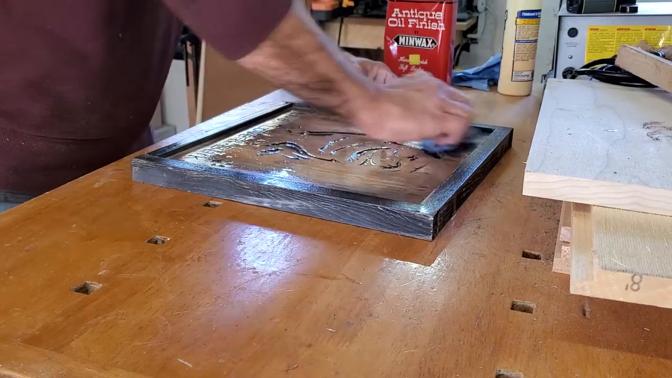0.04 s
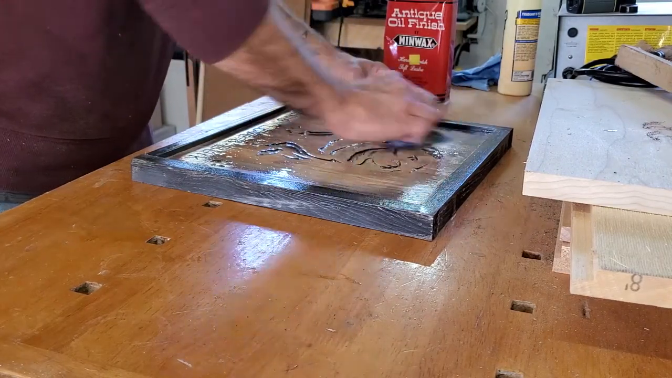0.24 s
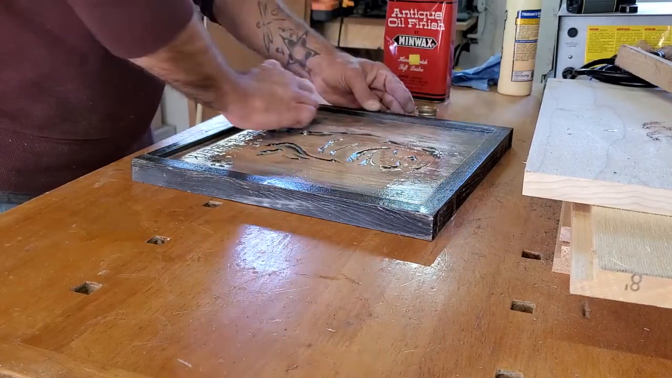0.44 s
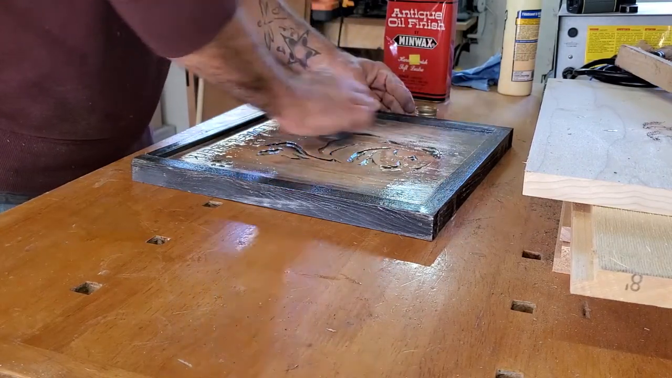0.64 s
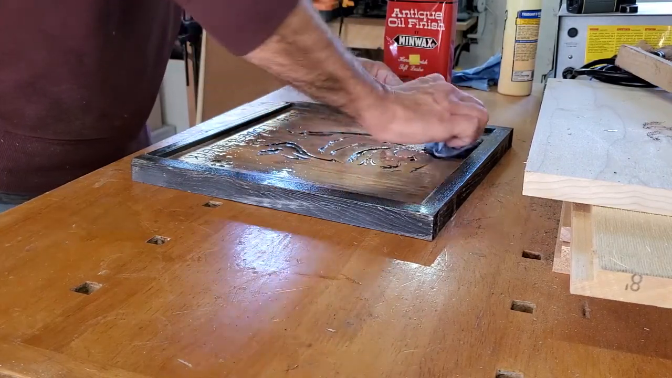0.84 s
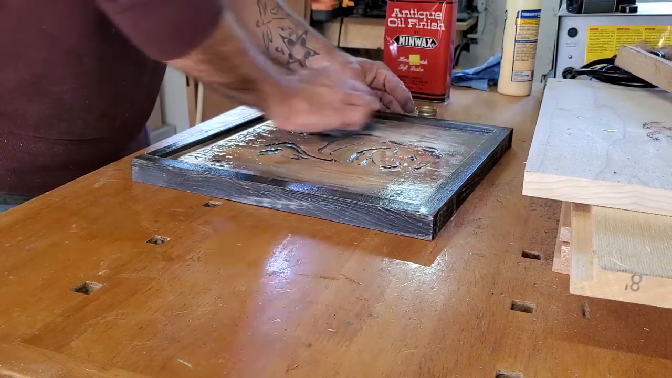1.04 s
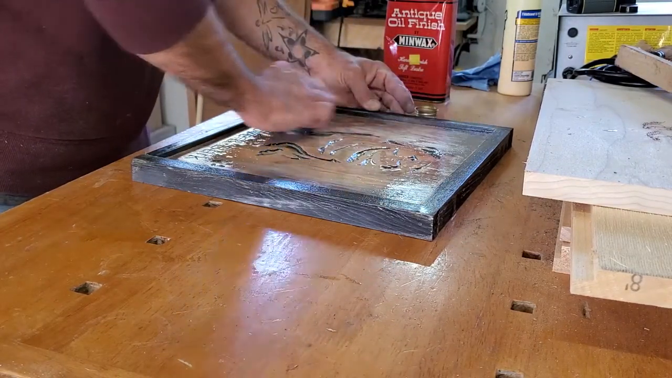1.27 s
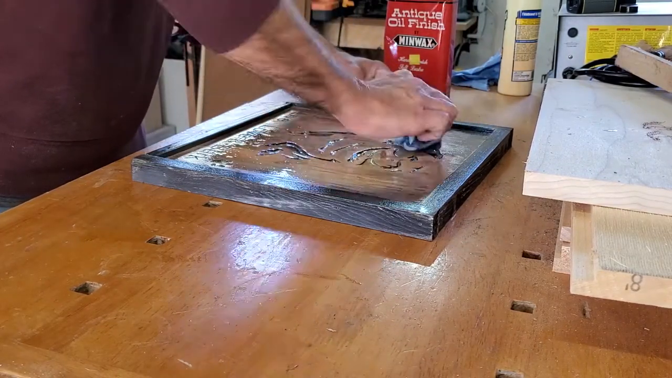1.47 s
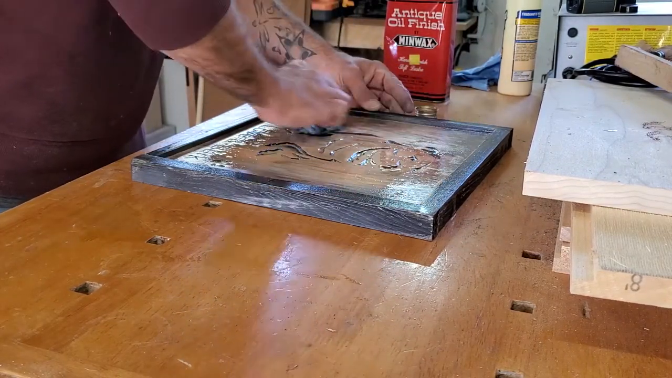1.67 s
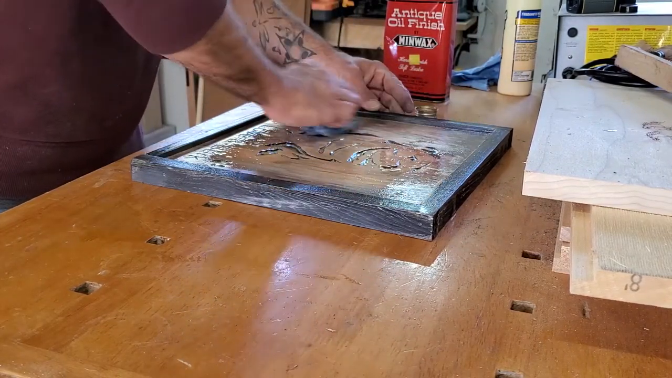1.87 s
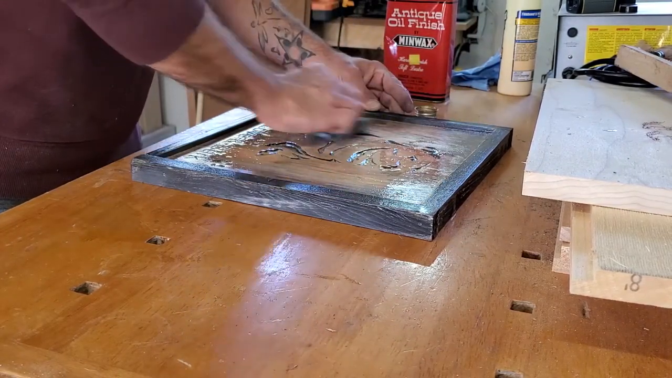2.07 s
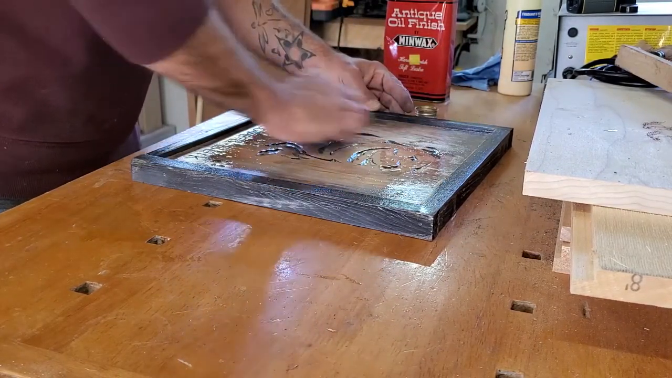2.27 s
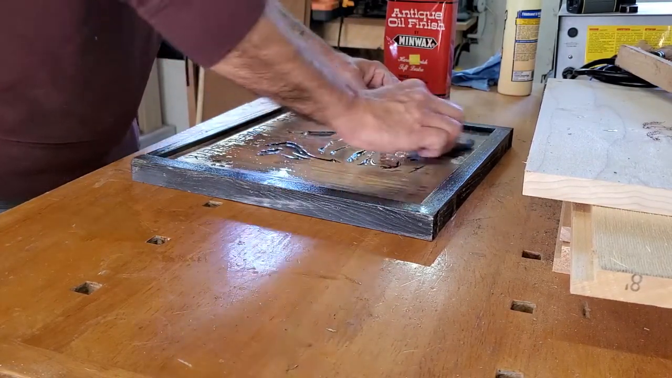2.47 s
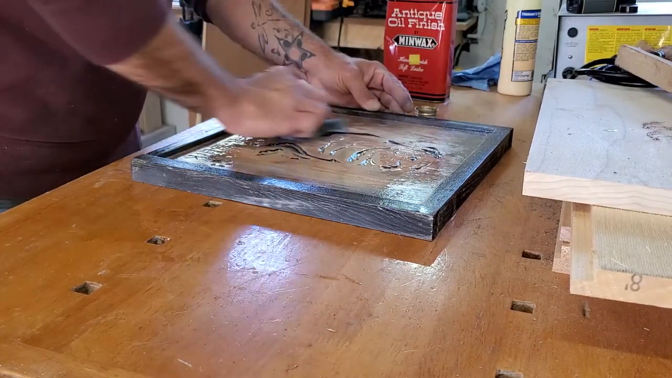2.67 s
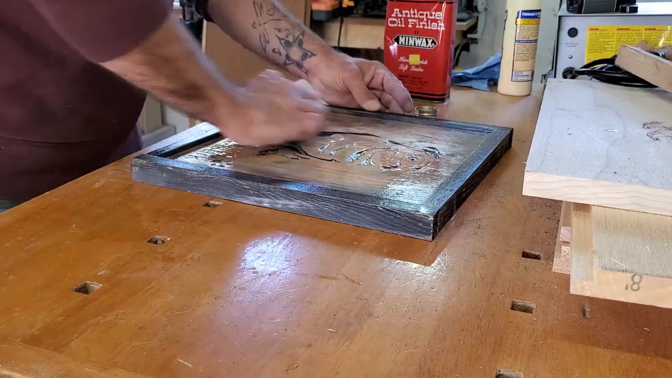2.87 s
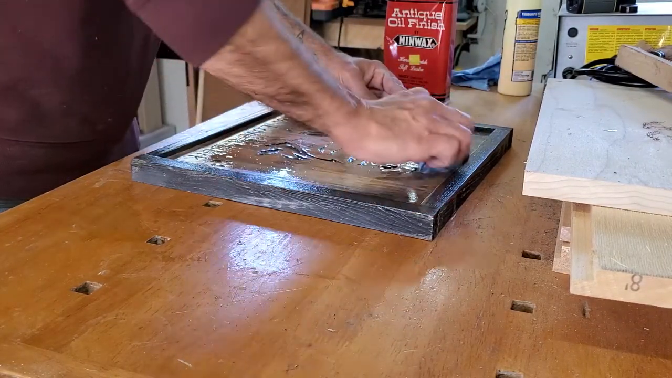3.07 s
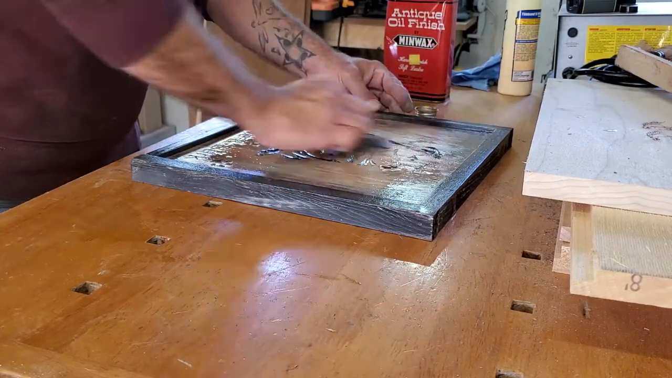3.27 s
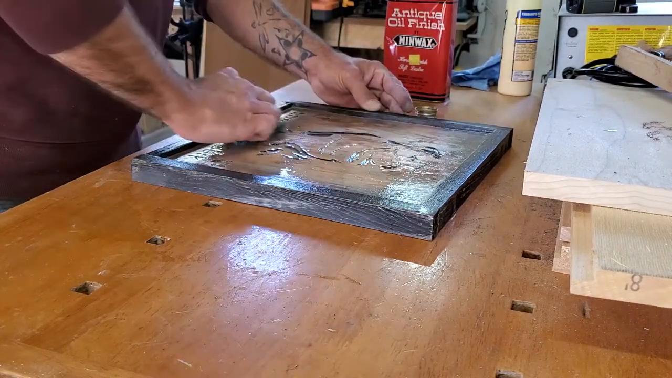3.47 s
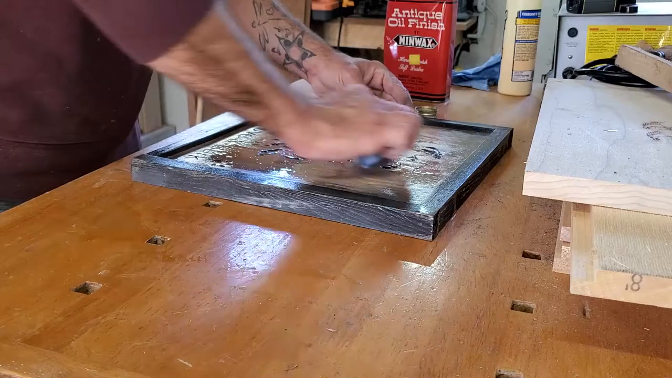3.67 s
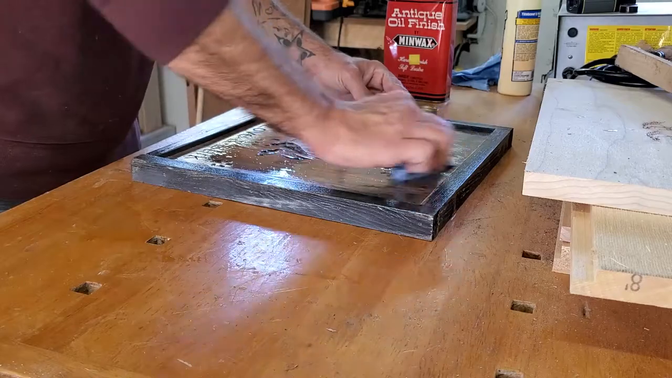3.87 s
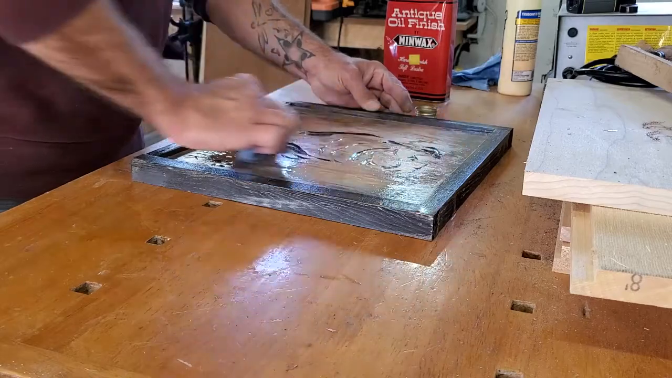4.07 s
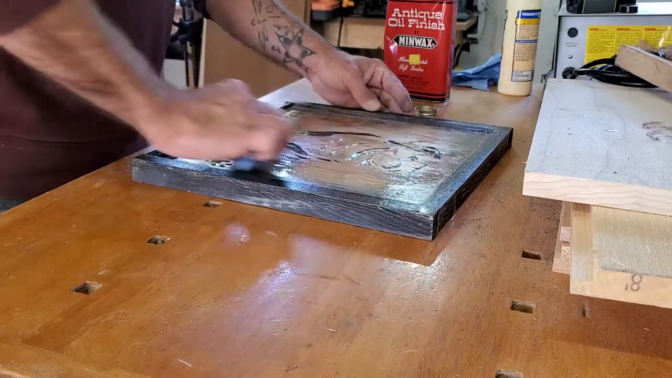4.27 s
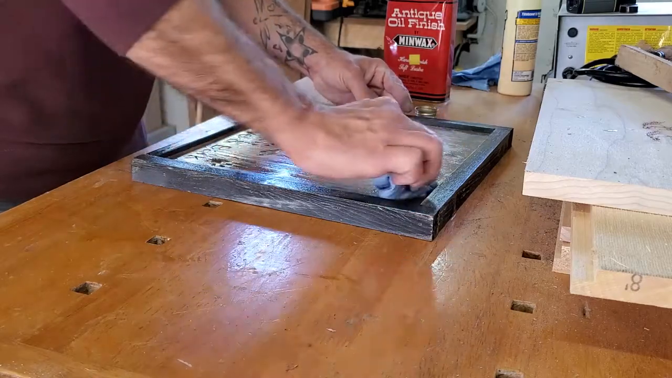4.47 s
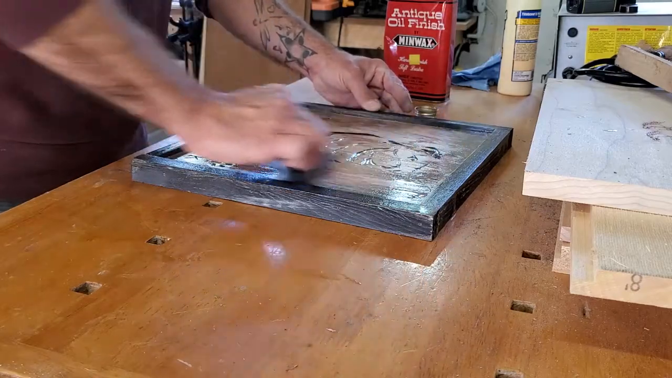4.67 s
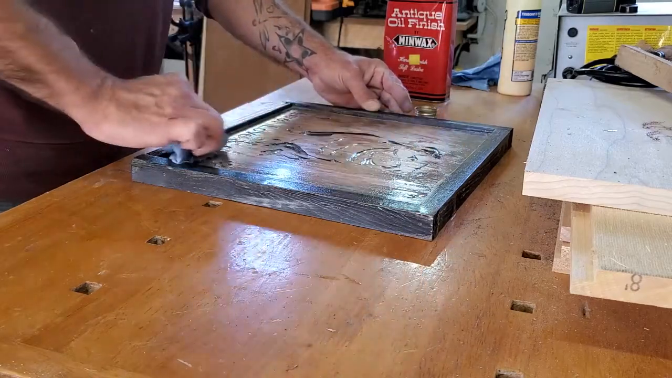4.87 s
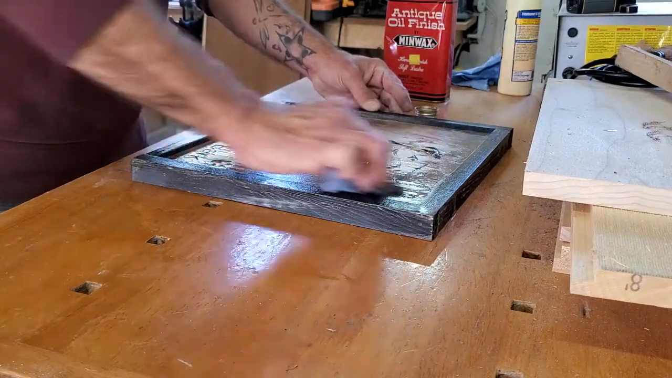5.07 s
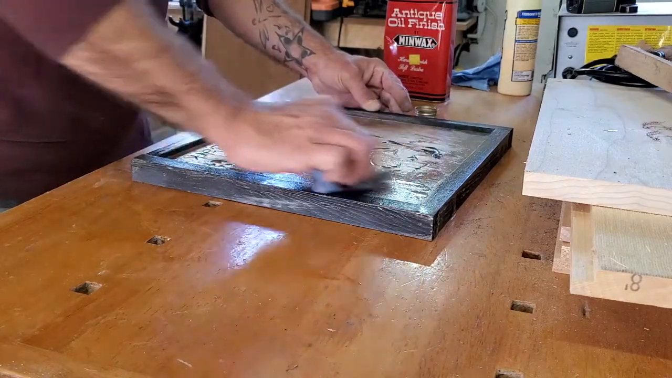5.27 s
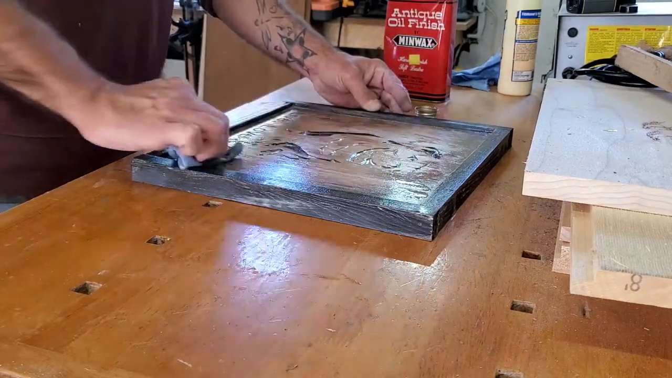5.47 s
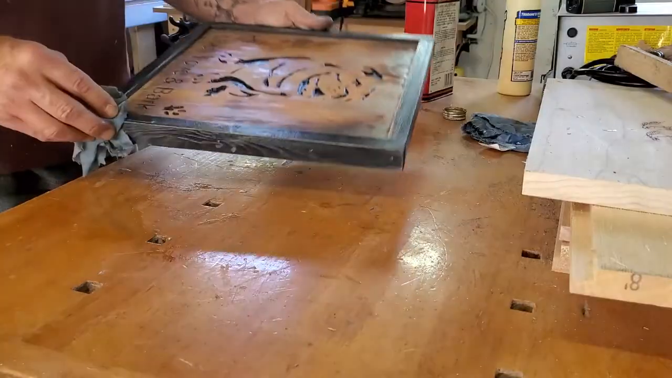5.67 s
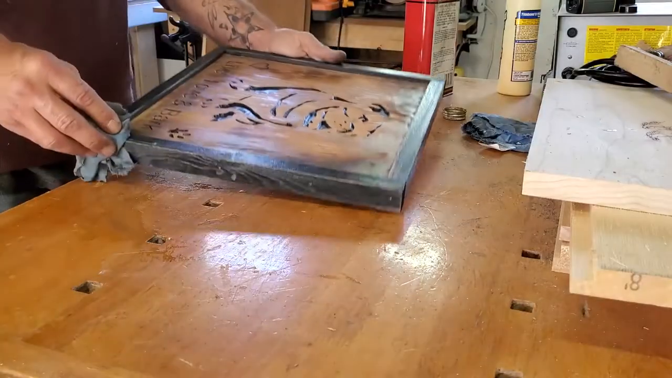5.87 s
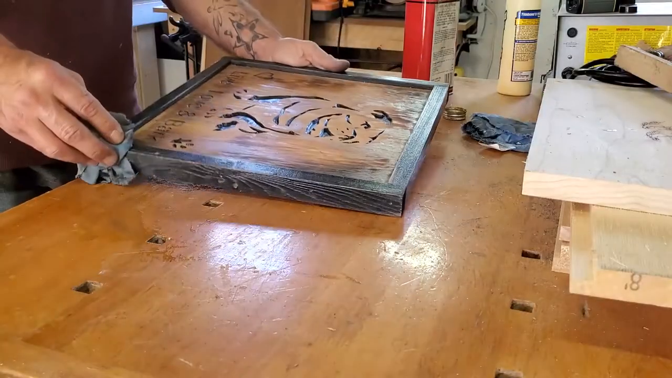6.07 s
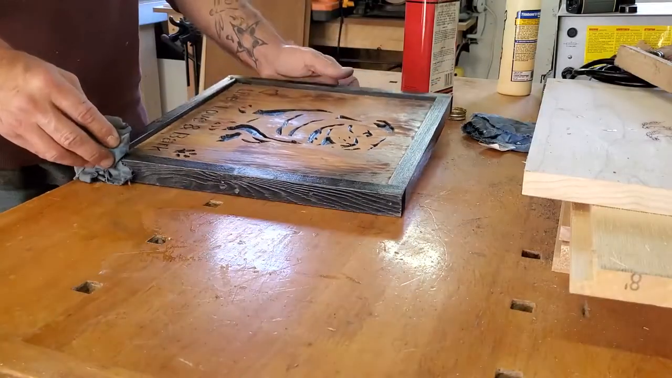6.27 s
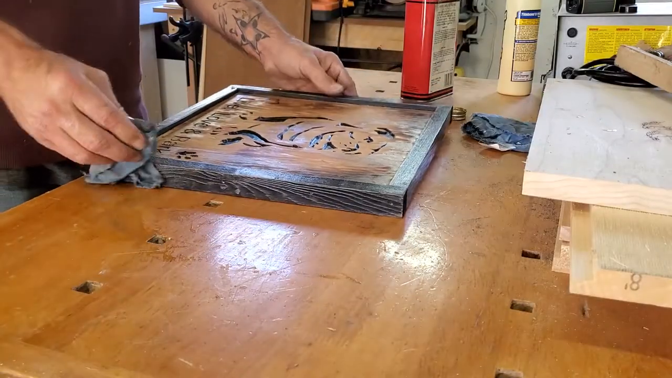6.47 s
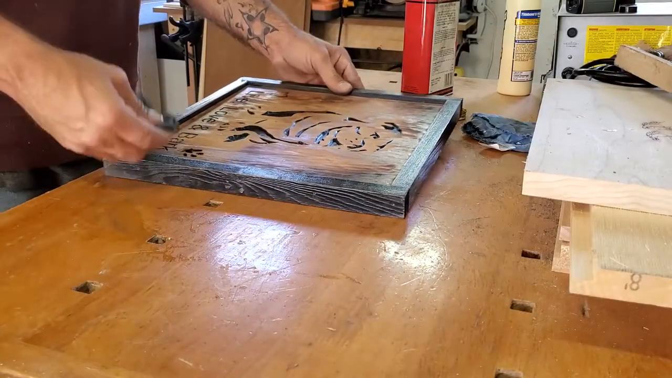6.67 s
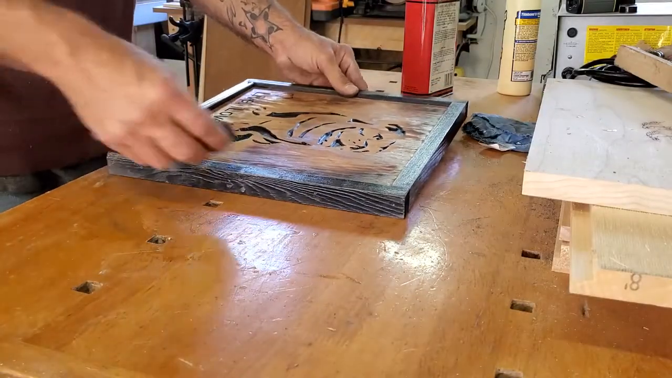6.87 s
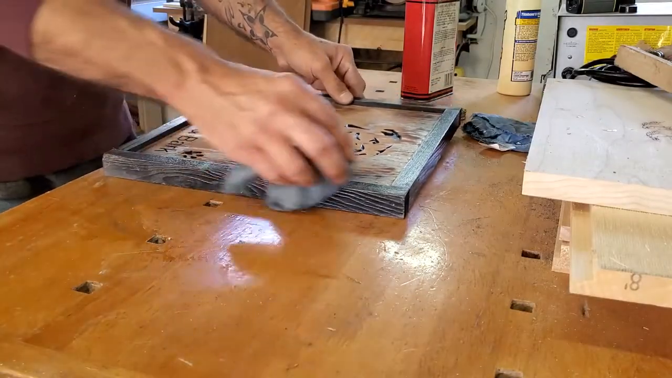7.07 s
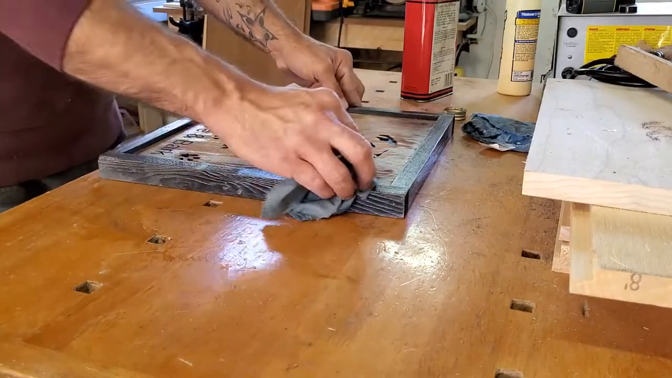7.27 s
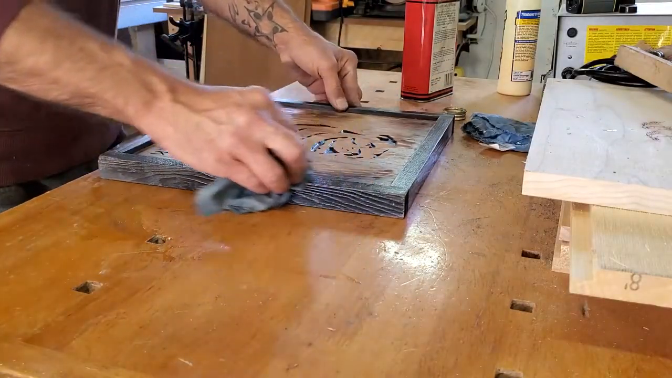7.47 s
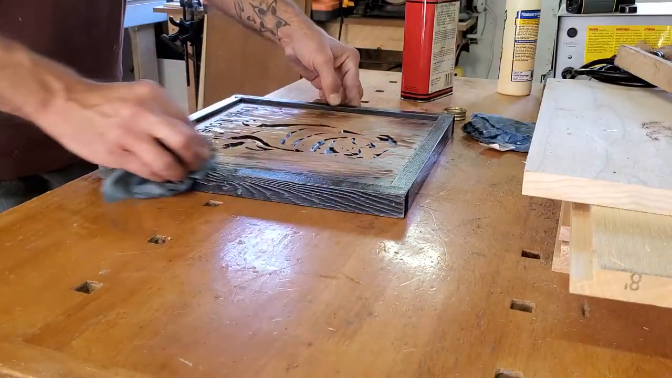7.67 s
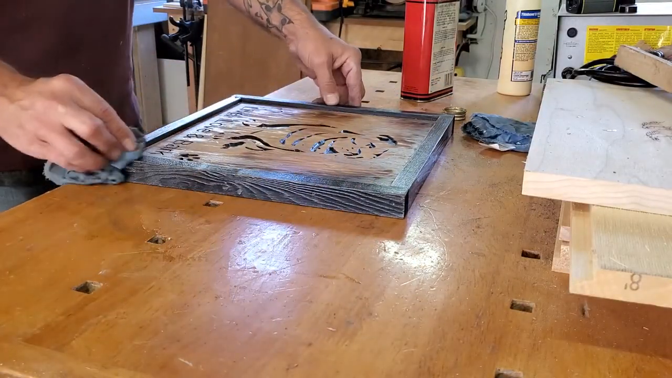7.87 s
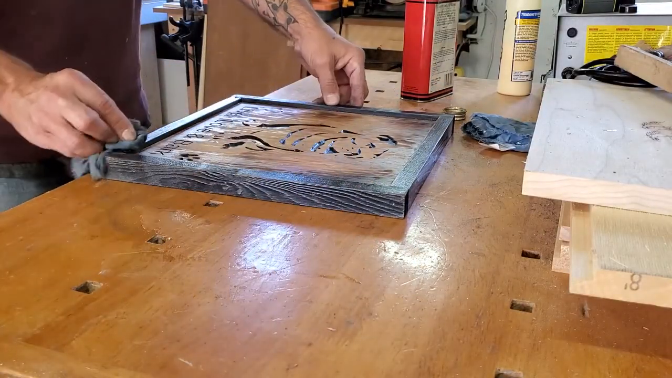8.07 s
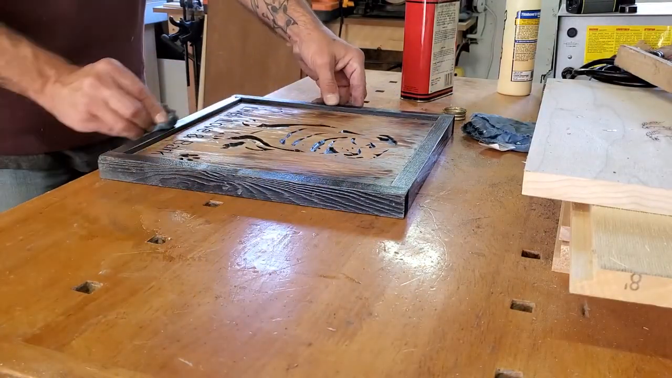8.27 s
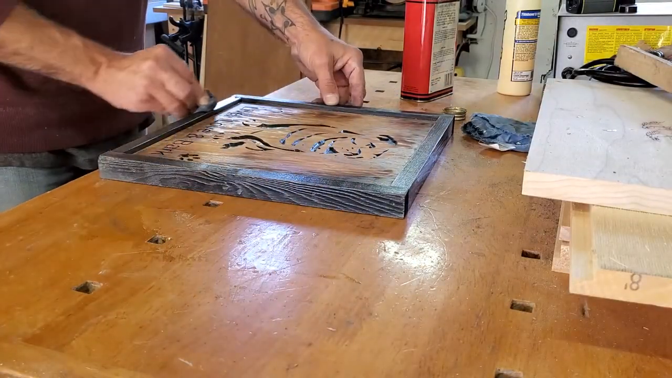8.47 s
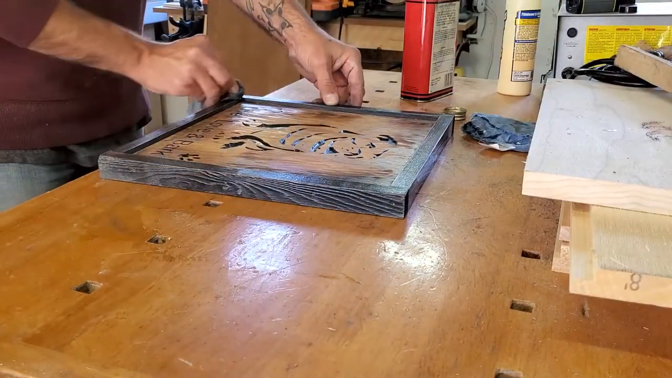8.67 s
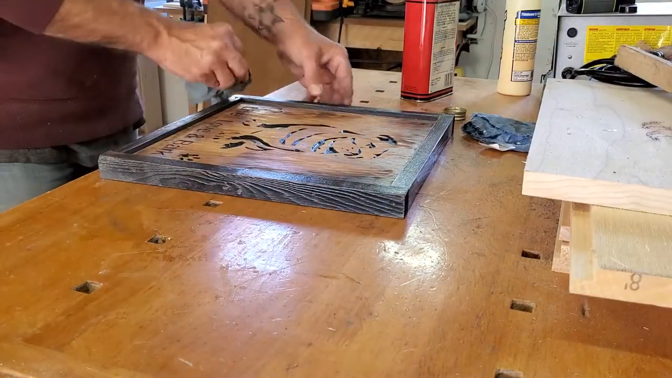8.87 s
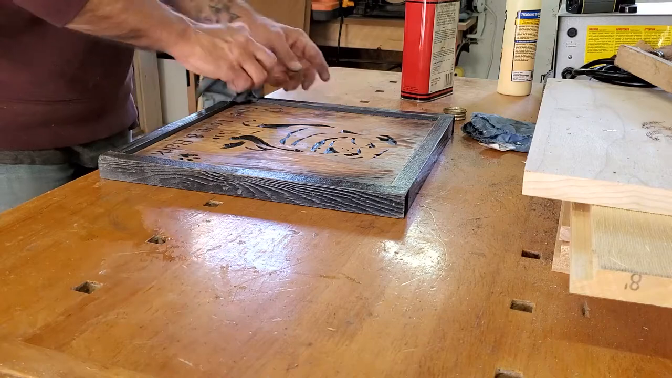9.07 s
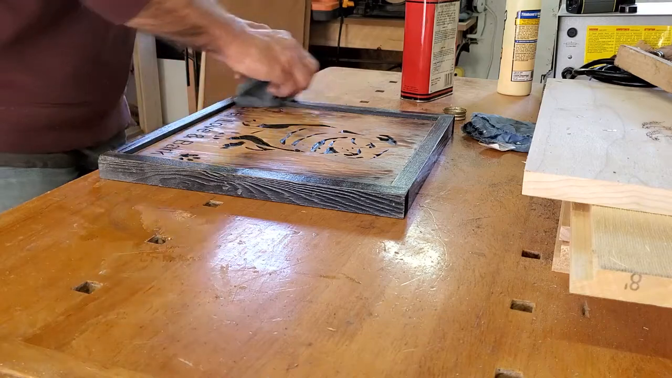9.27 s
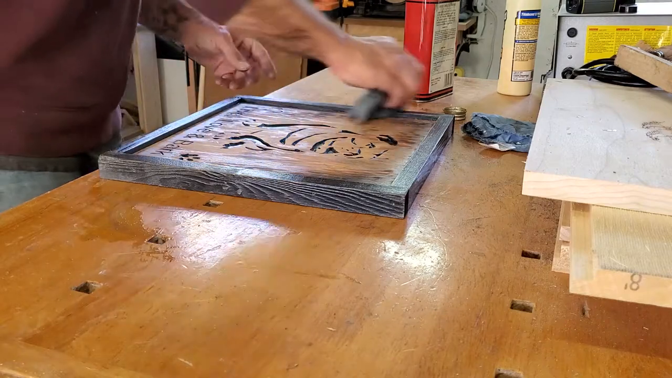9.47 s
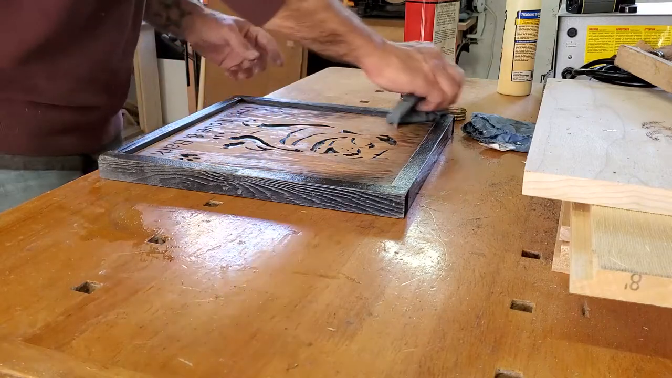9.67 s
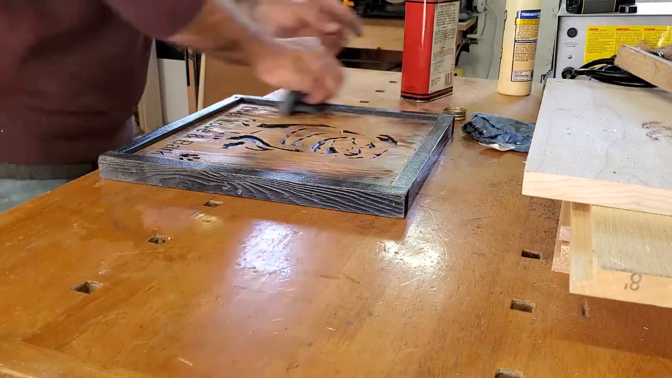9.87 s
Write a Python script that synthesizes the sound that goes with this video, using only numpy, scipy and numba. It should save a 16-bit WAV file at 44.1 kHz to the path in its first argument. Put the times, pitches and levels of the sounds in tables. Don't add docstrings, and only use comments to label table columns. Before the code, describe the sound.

Close up in a small workshop, a cloth rag rubs a framed wooden panel in fast to-and-fro strokes, hissing and rasping with a faint hollow boom, small clicks and short squeaks. The panel is lifted and set down with ringing wooden knocks, slides briefly on the bench, then gets softer, slower wipes and one last brisk rub. A distant engine drones low throughout.

```python
import sys
import numpy as np
from scipy import signal
from scipy.fft import rfft, irfft
from scipy.io import wavfile
from scipy.ndimage import uniform_filter1d, map_coordinates
from numba import njit

SR = 44100
rng = np.random.default_rng(int(sys.argv[2]) if len(sys.argv) > 2 else 0)


def volts_from_decibels(level):
    exponent = np.asarray(level, float) / 20
    return 10 ** exponent


def generate_wav(sig):
    pcm = np.round(np.clip(np.atleast_2d(sig).T, -1, 1) * 32767).astype(np.int16)
    wavfile.write(sys.argv[1], SR, pcm)


N = 437472

# turn in seconds, level at start in dB, level at end in dB,
# swell with speed in dB per tenfold, rasp compared with hiss in dB.
FACE = [(-.2, -51, -60.5, 24, -5), (0.081, -59.5, -54.5, 16.5, -6), (0.449, -55.5, -54, 21, -5),
        (.814, -58, -58.5, 14.5, -6.5), (1.161, -57, -55, 17, -3), (1.437, -62.5, -57.5, 13, -5.5),
        (1.621, -61, -59, 13, -2.5), (1.753, -59, -62, 13, -3.5), (1.868, -57, -64, 13, -4.5),
        (1.967, -63.5, -59.5, 7, -5), (2.133, -52.5, -60.5, 20, 0.5), (2.404, -59, -59, 11.5, 0.5),
        (2.741, -54.5, -53.5, 21.5, -0.5), (3.054, -59, -56, 15, -2), (3.406, -56.5, -58.5, 19, 2.5),
        (3.777, -59.5, -57.5, 15.5, -1.5), (4.115, -59.5, -59, 15, 2.5), (4.447, -62.5, -59.5, 10, 1),
        (4.798, -54, -60.5, 15.5, 0), (5.113, -60.5, -61.5, 12, 0.5), (5.451, -59.5, -71, 23, 5)]
RAILS = [(5.573, -80.5, -98, 2.8, -1.5), (5.94, -72.5, -69, 10, 4.5), (6.264, -75, -71, 16, 7),
         (6.458, -65.5, -80.5, 17, 9), (6.62, -80, -96, 3, 7), (6.79, -83.5, -59, 23, 1),
         (7.067, -77.5, -68.5, 13, 8), (7.157, -74, -62.5, 2, -0.5), (7.43, -63, -66.5, 3, -3),
         (7.885, -67, -64.5, 0.83, -19), (8.56, -73, -73, 2.5, -12), (8.613, -59.5, -72.5, 29, -5),
         (8.76, -77, -90, 1.9, 4), (9.04, -74, -61.5, 2, -1.5), (9.288, -48.5, -68, 21, 1),
         (9.515, -63, -56, 30, -3.5)]
# centre in Hz, width in Hz.
FOLDS = [(2700, 500), (3400, 600), (4300, 800), (5300, 900), (6600, 1200), (8300, 1800), (11500, 3000),
         (14500, 2500)]


def unit(x):
    return x / np.sqrt(np.mean(x ** 2))


def noise():
    return rng.standard_normal(N)


def curves(table):
    s, *columns = np.transpose(table)
    return [np.interp(np.arange(N) / SR, s, c) for c in columns]


def colour(x, points):
    hz, db = np.transpose(points)
    f = np.log(np.fft.rfftfreq(N, 1 / SR) + 1)
    return irfft(rfft(x) * volts_from_decibels(np.interp(f, np.log(hz), db)), N)


@njit
def svf(x, hz, width):
    y, b, l, g, k = np.empty(len(x)), 0., 0., 0., 0.
    for i in range(len(x)):
        if i % 8 == 0:
            g, k = np.tan(np.pi * hz[i] / SR), width / hz[i]
        v = (b + g * (x[i] - l)) / (1 + g * (g + k))
        b, l, y[i] = 2 * v - b, l + 2 * g * v, k * v
    return y


def band(x, hz, width_hz):
    return svf(x, hz + np.zeros(N), float(width_hz))


def steep(x, hz, width_hz):
    return unit(band(band(x, hz, width_hz), hz, width_hz))


def walk(rate):
    k = int(SR / rate)
    steps = np.repeat(rng.standard_normal(N // k + 1), k)
    return uniform_filter1d(uniform_filter1d(steps, k), k)[:N]


def slips(rate, spread_db):
    moments = rng.random(N) < rate / SR
    return unit(moments * rng.standard_normal(N) * volts_from_decibels(spread_db * rng.exponential(size=N)))


def add(out, x, s):
    i = int(s * SR)
    out[i:i + len(x)] += x[:N - i]


def delay(x, lag_us):
    return map_coordinates(x, [np.arange(N) - lag_us * SR / 10 ** 6], order=3)


def strokes():
    last_turn_s, creep = 9.95, 0.063
    t, rows = np.arange(N) / SR, np.array([*FACE, *RAILS])
    turns = np.append(rows[:, 0], last_turn_s)
    k = np.searchsorted(turns, t, side="right") - 1
    way = (t - turns[k]) / np.diff(turns)[k]
    speed = np.sin(np.pi * way)
    _, first_db, last_db, swell_db, rasp_db = rows[k].T
    pressure_db = first_db + (last_db - first_db) * way
    hiss_db = pressure_db + swell_db * np.log10((speed + creep) / (1 + creep))

    def roll(x):
        return uniform_filter1d(x, int(0.029 * SR))

    rasp_hz = 1605 + 420 * speed + 39 * roll(np.clip(rasp_db, -10, 3))
    return roll(hiss_db), roll(rasp_db), rasp_hz


def cloth():
    folds = [np.minimum(4 * walk(12), 4) for _ in FOLDS]
    return folds, 0.8 * walk(25), 2.2 * walk(40)


def rag(hiss_db, rasp_db, rasp_hz, folds, grip_db, grain_db):
    # pitch in Hz, level in dB per Hz.
    hiss_colour = [(150, -41), (290, -55), (600, -6.5), (971, -5.5), (1730, -2.5), (4350, -1.5), (9610, -4),
                   (15700, -4.5)]
    # centre in Hz, width in Hz, level in dB.
    skin = [(1240, 40, -13.5), (1400, 113, -13), (1730, 160, -18.5)]
    hiss = colour(slips(30000, 2.15), hiss_colour)
    for fold_db, (hz, width_hz) in zip(folds, FOLDS):
        hiss = hiss + (volts_from_decibels(fold_db) - 1) * band(hiss, hz, width_hz)
    hiss = unit(hiss)
    hiss = hiss + band(hiss, 13800, 12000) * volts_from_decibels(-16 - 0.96 * rasp_db)
    grain = slips(9000, 1.6)
    rasp = steep(grain, rasp_hz * volts_from_decibels(2.53 * walk(30)), 1440)
    rasp = rasp + 0.41 * steep(grain, 2 * rasp_hz, 500)
    rasp = signal.sosfilt(signal.butter(6, 1150, "highpass", fs=SR, output="sos"), rasp)
    rasp = rasp + sum(volts_from_decibels(db + walk(12)) * unit(band(rasp, hz, width_hz)) for hz, width_hz, db in skin)
    hiss = hiss * volts_from_decibels(2 + 3.2 * walk(60))
    rasp = rasp * volts_from_decibels(rasp_db - 4 + grain_db)
    return (hiss + rasp) * volts_from_decibels(hiss_db + grip_db)


def port_lag():
    # time in seconds, lag in microseconds.
    rail_lag = [(6.4, 162), (7.1, 47), (7.85, 221), (8.401, 143), (9.35, 1), (9.7, 96)]
    ends = [(s, 36 + 21 * s if k % 2 == 0 else -20) for k, (s, *_) in enumerate(FACE)]
    return curves([*ends, *rail_lag])[0]


def boom(hiss_db, rasp_db):
    push_db = hiss_db + 0.96 * rasp_db
    drum = steep(noise(), 356, 43) * volts_from_decibels(push_db - 12 + 2 * walk(23))
    bench = steep(noise(), 430, 650) * volts_from_decibels(-77.5 + 5.4 * (push_db + 56.5))
    before_lift = np.arange(N) < RAILS[0][0] * SR
    return before_lift * (drum + bench)


def drone():
    # time in seconds, firing pitch in Hz, level in dB.
    engine = [(0, 70, -67.5), (1.2, 73, -66), (1.6, 66, -70), (3.0, 69, -68.5), (4.1, 73, -68),
              (5.6, 69, -64), (6.2, 68, -56), (7.9, 69.3, -57), (8.3, 71, -54.5), (9.1, 69.5, -54.5),
              (9.92, 73.5, -56)]
    # pitch in Hz, level in dB per Hz.
    rumble_colour = [(25, -21), (48, 7.5), (85, 3), (125, -17), (180, -46.5)]
    hz, tone_db = curves(engine)
    turning = np.cumsum(hz * (1 + 0.015 * walk(10))) / SR
    tone = np.sqrt(2) * np.sin(2 * np.pi * turning) * volts_from_decibels(tone_db + 1 + 3 * walk(11))
    growl = steep(noise(), 106, 60) * volts_from_decibels(tone_db - 19.5)
    rumble = unit(colour(noise(), rumble_colour)) * volts_from_decibels(-45 + 0.31 * tone_db + 0.5 * walk(2.3))
    return tone + growl + rumble


def air():
    # pitch in Hz, level in dB per Hz.
    air_colour = [(59, -16), (165, -22.5), (240, -20.5), (363, -20.5), (1120, -28.5), (4500, -42),
                  (6500, -70), (15700, -92)]
    # pitch in Hz, width in Hz, level in dB.
    lamp = (5900, 110, -96.5)
    hz, width_hz, db = lamp
    still = unit(colour(noise(), air_colour)) * volts_from_decibels(-72.5 + 1.1 * walk(5))
    return still + steep(noise(), hz, width_hz) * volts_from_decibels(db + 7 * walk(12))


def ticks_and_squeaks():
    # time in seconds, peak in dB, centre in Hz, length in milliseconds.
    snaps = [(0.164, -39, 8000, 1), (.532, -46, 3560, 0.38), (0.9157, -27, 12500, 0.41),
             (2.24, -43, 13000, .5), (4.027, -39, 8000, 0.99), (4.294, -51, 2500, 0.77),
             (4.312, -40.5, 2250, .9), (4.828, -44, 2510, 1.1), (6.393, -41.5, 2800, 0.4),
             (6.3947, -41, 12000, 0.2), (6.3944, -49, 6500, 0.25), (7.786, -44, 9000, .6),
             (7.913, -48, 3080, 2.5), (9.404, -37, 9100, .6)]
    # start in seconds, length in seconds, first Hz, last Hz, level in dB.
    squeaks = [(0.443, 0.08, 6340, 6450, -60), (2.86, 0.09, 1470, 1680, -57),
               (3.608, 0.061, 2210, 1360, -55), (4.958, 0.068, 2270, 1760, -48.5),
               (4.963, 0.081, 4050, 3800, -57.5), (5.338, 0.068, 1940, 1160, -58.5),
               (7.507, 0.12, 1400, 1160, -61.5), (9.713, 0.067, 2720, 2500, -54),
               (9.72, .05, 4600, 4380, -60), (1.023, 0.085, 1750, 1650, -64),
               (1.194, 0.067, 1300, 1250, -60), (.5, 0.046, 1300, 1300, -60),
               (7.897, 0.041, 1510, 1500, -60)]
    out, t, rub = np.zeros(N), np.arange(-220, 220) / SR, noise()
    for s, db, hz, ms in snaps:
        snap = svf(rub[int(s * SR):][:len(t)], hz + 0 * t, 0.31 * hz)
        snap = snap * np.exp(-(1000 * t / ms) ** 2)
        add(out, volts_from_decibels(db) * snap / np.abs(snap).max(), s + t[0])
    for s, length, from_hz, to_hz, db in squeaks:
        n = int(length * SR)
        width_hz = 650. if from_hz < 5000 else 200.
        glide = np.linspace(from_hz, to_hz, n)
        sing = svf(rub[int(s * SR):][:n], glide, width_hz)
        sing = unit(svf(sing, glide, width_hz))
        add(out, volts_from_decibels(db) * np.hanning(n) ** 0.5 * sing, s)
    return out


def blow(modes, where, push):
    t = np.arange(SR // 2) / SR
    hz, db, t60 = np.transpose(modes)[:, :, None]
    sense = (-1.) ** np.arange(len(modes))[:, None]
    fade = np.exp(-np.log(1000) * t / t60)
    ring = sense * volts_from_decibels(db + where) * np.sin(2 * np.pi * hz * t) * fade
    ring = np.convolve(ring.sum(axis=0) * (1 - np.exp(-t / 0.0016)), push)
    return ring / np.abs(ring).max()


def burst(x, s, decay_s):
    t = np.arange(SR // 4) / SR
    return x[int(s * SR):][:len(t)] * (1 - np.exp(-t / 0.0004)) * np.exp(-t / decay_s)


def knocks():
    # time in seconds, peak in dB, brightness in dB per octave,
    # thud compared with peak in dB, bench thump compared with peak in dB.
    contacts = [(5.786, -21.5, 1, -10, -15.5), (5.837, -28, 6, -11.5, -13), (5.917, -74.5, 1, -21, -9),
                (6.011, -25, 4, -16, -4.5), (6.027, -15.5, 6.5, -12.5, -14),
                (6.035, -17.5, -1.5, -25.5, -42), (6.119, -39.5, -28, -17, -13),
                (6.338, -57.5, -23, -19, -3), (6.514, -50, -13, -7, -11), (6.524, -37.5, -3, -29, -1.5),
                (6.544, -40, -16, -17, -11), (7.144, -49.5, 2, 6, 4), (7.166, -55, -16, -8, -9),
                (7.19, -51.5, -30, -21, 5), (6.572, -49, -10, -21, -13), (8.677, -59, 1, -2, 3)]
    # time in seconds, peak in dB.
    corners = [(5.787, -33), (5.8367, -42), (6.0108, -41), (6.025, -22), (6.044, -45), (6.4951, -64),
               (6.5216, -49), (6.865, -61), (7.0965, -53), (7.1192, -53)]
    # pitch in Hz, level in dB, time to fade by 60 dB in seconds.
    panel_modes = [(226, -6.5, 0.093), (270.3, 6.5, 0.17), (329, 6.5, 0.13), (380, -15.5, 0.059),
                   (418, -13, .12), (513, -5.5, 0.12), (549, -0.5, 0.1), (583, 0.5, 0.1), (784, -1, 0.071)]
    bench_modes = [(70, 8, 0.19), (101.7, 4, 0.32), (150, -6.5, 0.12)]
    frame_modes = [(897, -8, 0.12), (1007, -31, 0.068), (1172, 2.5, 0.088), (1330, 0, 0.072),
                   (1457, 5, 0.032), (1689, 13.5, 0.016), (1860, 0.5, 0.034), (2500, -28, 0.18),
                   (2500, -12, .05)]
    out = np.zeros(N)
    thud, grit = steep(noise(), 400, 360), steep(noise(), 1600, 1400)
    octave = np.log2(np.array(panel_modes)[:, :1] / panel_modes[0][0])
    spots = rng.standard_normal((len(contacts), len(panel_modes), 1))
    for (s, db, tilt_db, thud_db, thump_db), spot in zip(contacts, spots):
        where = 2.9 * spot + tilt_db * octave
        add(out, volts_from_decibels(db - 0.5) * blow(panel_modes, where, np.hanning(36)), s)
        add(out, volts_from_decibels(db + thump_db) * blow(bench_modes, 0, np.hanning(90)), s)
        add(out, volts_from_decibels(db + thud_db) * burst(thud, s, 0.0085), s)
    spots = rng.standard_normal((len(corners), len(frame_modes), 1))
    for (s, db), spot in zip(corners, spots):
        add(out, volts_from_decibels(db - 2) * blow(frame_modes, spot, np.hanning(14)), s)
        add(out, volts_from_decibels(db - 10) * burst(grit, s, 0.0047), s)
    return signal.sosfilt(signal.butter(3, 3600, fs=SR, output="sos"), out)


def drag():
    # start in seconds, length in seconds, level at start in dB, level at end in dB.
    slides = [
        (6.103, 0.14, -51.5, -70),
        (6.305, 0.097, -78, -67),
        (6.488, 0.23, -72, -71.5),
        (6.852, 0.25, -61, -69),
        (7.091, 0.093, -51.5, -72),
    ]
    # pitch in Hz, width in Hz, level in dB.
    drag_modes = [(524, 45, -0.5), (787, 33, -5), (954, 94, 1), (1324, 110, 3), (1480, 150, -6),
                  (2450, 240, -7.5)]
    chatter = slips(1500, 0.92)
    wood = unit(sum(volts_from_decibels(db + 6.7 * walk(25)) * steep(chatter, hz, width) for hz, width, db in drag_modes))
    t, gain = np.arange(N) / SR, 0
    for s, length, start_db, end_db in slides:
        sliding = (t > s) & (t < s + length)
        gain = gain + sliding * volts_from_decibels(np.interp(t, [s, s + length], [start_db, end_db]))
    return wood * uniform_filter1d(gain, size=400)


def room(x):
    t = np.arange(SR // 2) / SR
    tail = rng.standard_normal(len(t)) * np.exp(-np.log(1000) * t / 0.32)
    tail = tail * np.clip(t / 0.0062, 0, 1)
    return signal.fftconvolve(x, volts_from_decibels(-9) * tail / np.sqrt(np.sum(tail ** 2)))[:N]


def scene():
    # pitch in Hz, level in dB.
    direct = [(700, 0), (2000, -1.5), (4500, -2.5), (12000, -6)]
    # pitch in Hz, level in dB.
    scattered = [(100, -17), (400, -12), (900, -4), (2000, -2), (5000, 1), (12000, 2.5)]
    wood = knocks() + drag()
    rub = (*strokes(), *cloth())
    near = colour(rag(*rub), direct) + ticks_and_squeaks() + wood + boom(*rub[:2])
    far = colour(air() + room(wood), direct) + drone()
    own = [colour(rag(*rub) + air() + 2.1 * room(wood), scattered) for _ in range(2)]
    left = near + 0.12 * wood + far + own[0]
    right = delay(near, port_lag()) + far + own[1]
    return np.array([left, right])


def top_cut(x):
    return signal.sosfilt(signal.butter(12, 16620, fs=SR, output="sos"), x)


def record(dry):
    # pitch in Hz, level in dB.
    microphone = [(8000, -0.5), (9500, -5.5), (10800, -0.5)]
    cut = signal.butter(2, 45, "highpass", fs=SR, output="sos")
    mix = np.array([colour(port, microphone) for port in signal.sosfilt(cut, dry)])
    return top_cut(mix)


dry = scene()
out = record(dry)
generate_wav(out)
```